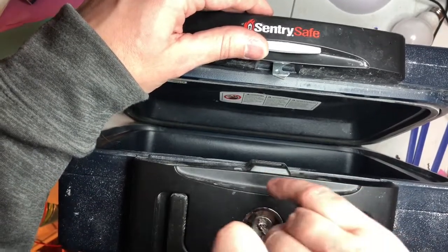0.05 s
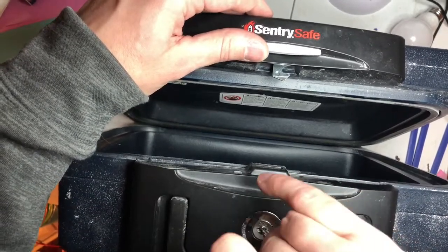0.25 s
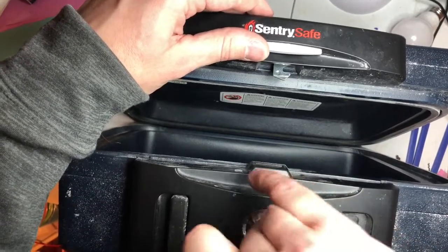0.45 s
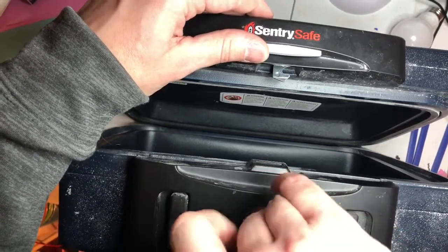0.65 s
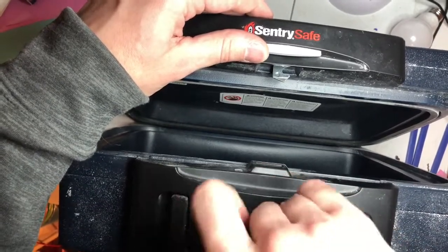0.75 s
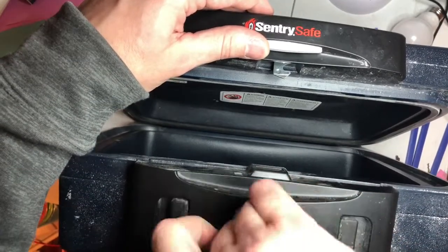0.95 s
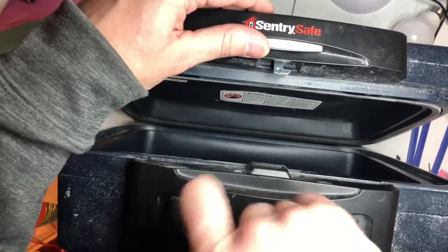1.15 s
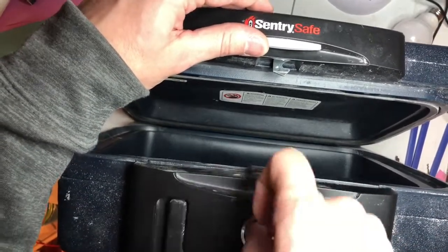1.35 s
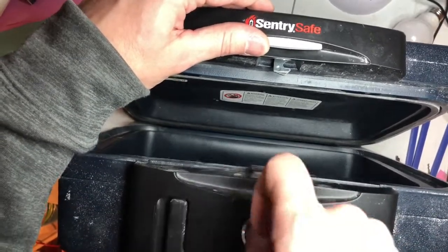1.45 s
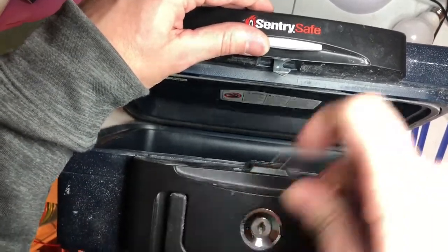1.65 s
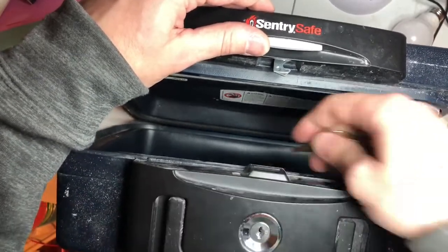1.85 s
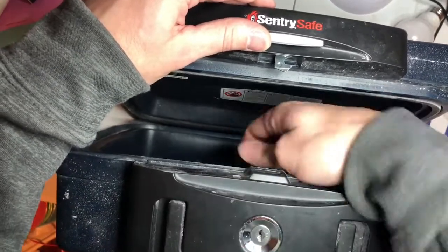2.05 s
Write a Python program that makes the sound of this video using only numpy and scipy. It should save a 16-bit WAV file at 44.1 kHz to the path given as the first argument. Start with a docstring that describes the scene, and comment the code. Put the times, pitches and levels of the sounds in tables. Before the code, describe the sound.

A key and metal latch click on a hollow plastic chest, close by in a quiet room, with the loudest clack and a hollow thud near 0.5 seconds. Faint finger rubbing and sleeve rustle join lighter clicks from 0.8 to 1.5 seconds. At about 1.75 seconds the key comes free with a briefly ringing click. A light scrape and faint key jingle follow around 2 seconds.

```python
"""A hand works the key and metal latch of a hollow plastic chest, close by in a small quiet room.
Key and latch click and grind first, loudest near 0.46 s: impacts excite the modes of shell and latch,
and shoves set the cavity booming. Then fingers rub the shell, a sleeve rustles and a second run of
clicks builds to 1.4 s. Near 1.75 s the key comes free and the lock panel springs back;
last, the hand scrapes the rim and the key is carried off with a faint jingle."""
import sys
import numpy as np
from scipy import signal
from scipy.io import wavfile
from scipy.ndimage import uniform_filter1d

SR = 44100
rng = np.random.default_rng(int(sys.argv[2]) if len(sys.argv) > 2 else 0)


def digitize_waveform(pressure):
    """Quantize a signal to 16-bit integers and store it at the path in sys.argv[1].

    Rows of a 2-D input are taken as channels; values are limited to [-1, 1].
    """
    field = np.atleast_2d(pressure).T
    bounded = np.clip(field, -1, 1)
    quanta = np.round(bounded * 32767).astype(np.int16)
    wavfile.write(sys.argv[1], SR, quanta)


N = 92610
T = np.arange(N) / SR


def amp(db):
    """Amplitude ratio of a level in decibels."""
    return 10 ** (np.asarray(db) / 20)


def unit(x):
    """Normalisation to an rms of one."""
    return x / np.sqrt(np.mean(x ** 2) + 1e-20)


def read(points, hz):
    """Interpolation along a logarithmic frequency axis."""
    frequency_hz, value = np.transpose(points)
    return np.interp(np.log(hz + 0.00085), np.log(frequency_hz), value)


def level(points):
    """Amplitude envelope, interpolated in decibels."""
    return amp(np.interp(T, *np.transpose(points)))


def add(mix, start_s, sound):
    """Superposition of a sound on the mix."""
    part = mix[max(round(start_s * SR), 0):][:len(sound)]
    part += sound[:len(part)]


def colour(x, spectrum, scale=1, size=4096):
    """Minimum-phase filtering by a spectrum whose frequencies are multiplied by scale."""
    hz = abs(np.fft.fftfreq(size, 1 / SR))
    log_gain = np.log(amp(read(spectrum, hz / scale)))
    response = np.exp(np.conj(signal.hilbert(log_gain)))
    taps = np.fft.ifft(response).real[:size // 2]
    return signal.fftconvolve(x, taps)[:len(x)]


def impulses(per_s, spread_db=3):
    """A Poisson train of tiny jerks, a few much larger than the rest."""
    train = (rng.random(N) < per_s / SR) * rng.choice([-1, 1], N)
    return train * amp(spread_db * np.minimum(rng.exponential(1, N), 3))


# Spectrum of the quiet room: frequency_hz, gain_db
BACKGROUND_SPECTRUM = [(20, -17.5), (50, 3), (130, 4.5), (300, -2.5), (700, -13), (1500, -13.5),
                       (4000, -14.5), (9000, -25), (16000, -26.5)]

def background(level_db=-67):
    """Stationary noise, strongest in the bass."""
    return amp(level_db) * unit(colour(rng.standard_normal(N), BACKGROUND_SPECTRUM))


# Envelope of the shifting grip: time_s, level_db
GRIP_ENVELOPE = [(0, -84), (.14, -72), (.24, -56), (.36, -66.5), (.55, -60.5), (.7, -62.5), (.8, -58),
                 (.95, -57.5), (1.05, -63.5), (1.2, -61.5), (1.33, -66.5), (1.48, -59.5), (1.58, -67.5),
                 (1.8, -66.5), (2.1, -72)]
# Spectrum of its rumble: frequency_hz, gain_db
GRIP_SPECTRUM = [(25, -10.5), (55, -2.5), (100, -2.5), (135, 1), (190, -7), (260, -6.5), (380, -5),
                 (700, -17.5), (2000, -53.5)]

def grip():
    """Structure-borne noise: the case rumbles as the hand leans and shifts on it."""
    return level(GRIP_ENVELOPE) * unit(colour(rng.standard_normal(N), GRIP_SPECTRUM))


# Contacts of key, latch and shell: start_s, pitch_hz, knock_db, clack_db, tick_db, sparkle_db
CONTACTS = [ (.080, 650, -49, -79, -102, -82), (.128, 500, -45, -39, -47.5, -83),
            (.149, 417, -40, -37, -48, -28), (.1525, 480, -35.5, -32, -41, -35),
            (.182, 575, -45, -59, -70, -74), (.197, 484, -38, -47, -59, -67),
            (.202, 410, -33.5, -45, -65, -80), (.211, 370, -33.5, -35, -61, -66),
            (.2195, 480, -39, -32, -41, -68), (.297, 616, -46.5, -53.5, -63, -79),
            (.356, 505, -64, -60.5, -58.5, -66), (.373, 403, -53, -85, -78, -82),
            (.4215, 420, -25, -26.5, -52, -49), (.432, 380, -32, -55, -52, -67),
            (0.44, 406, -35, -41, -50.5, -55), (.447, 400, -39, -26.5, -36, -57),
            (.453, 514, -23, -42, -54, -54.5), (.460, 384, -23, -35, -48, -44),
            (.465, 458, -17, -23, -26.5, -37), (.4715, 291, -20, -14.5, -16, -27.5),
            (.481, 560, -26, -38, -39, -47), (.563, 670, -45.5, -53, -66, -78),
            (.841, 1200, -49, -57, -67, -78), (.878, 500, -44.5, -61, -70, -80),
            (.909, 443, -45.5, -43, -43.5, -41.5), (.930, 514, -41.5, -39.5, -63, -74),
            (.941, 513, -51, -50.5, -52.5, -72), (1.001, 720, -51, -61, -78, -80),
            (1.018, 655, -41, -53, -70, -80), (1.030, 576, -34, -44.5, -70, -80),
            (1.038, 537, -34, -46, -61, -78), (1.057, 540, -42.5, -55, -74, -80),
            (1.100, 620, -48, -55, -68, -77), (1.129, 690, -31.5, -40.5, -51.5, -52.5),
            (1.179, 1170, -39.5, -47.5, -77, -78), (1.232, 560, -44, -44.5, -65, -68),
            (1.246, 574, -45.5, -54, -46.5, -76), (1.294, 553, -46.5, -56, -54, -55),
            (1.305, 554, -56, -70, -61, -54), (1.3395, 800, -49, -56, -66, -61),
            (1.341, 1340, -39.5, -48, -48, -42), (1.378, 670, -38.5, -65, -77, -87),
            (1.390, 640, -41, -50, -63, -60), (1.399, 646, -44, -56, -50, -58),
            (1.411, 700, -31, -44, -47, -44), (1.416, 620, -37, -40, -33.5, -43),
            (1.425, 510, -29, -62, -48, -61), (1.437, 500, -40.5, -56, -45, -41),
            (1.445, 553, -38, -47, -59, -30), (1.455, 680, -43, -57, -55, -38),
            (1.468, 606, -47, -39, -40, -39), (1.471, 700, -32.5, -37, -39.5, -59),
            (1.480, 590, -45, -45, -53, -50), (1.748, 621, -36.5, -38.5, -36.5, -45.5),
            (1.752, 557, -36.5, -46.5, -71, -60), (1.771, 498, -47, -52, -51, -58.5),
            (1.817, 597, -47.5, -51, -47.5, -66)]
# Knock of the plastic shell: ratio_to_pitch, gain_db
KNOCK_SPECTRUM = [(.08, -37), (.3, -21.5), (.7, -2.5), (1, 1.5), (1.5, -4.5), (2.4, -12), (6, -64)]
# Clack of the latch plate: frequency_hz, gain_db
CLACK_SPECTRUM = [(300, -37), (800, -5), (1150, 2.5), (1850, 2), (2300, 7), (3200, -9.5), (4200, -14.5),
                  (5200, -36), (12000, -57)]
# Tick of the small steel parts: frequency_hz, gain_db
TICK_SPECTRUM = [(1200, -53.5), (2800, 1.5), (4200, 2.5), (5100, -3.5), (6500, -1.5), (8200, -5),
                 (10500, -12.5), (15000, -24)]
# Sparkle of their edges: frequency_hz, gain_db
SPARKLE_SPECTRUM = [(4000, -44), (8500, 2.5), (11000, 2.5), (13000, 10.5), (15000, 14.5), (16500, -18.5)]

def impact(spectrum, t60_s, scale=1, snap=1, snap_s=0.00029):
    """Dense modes struck together act as decaying noise, led by a brief snap."""
    t = T[:SR // 8]
    decay = amp(-60 * t / t60_s)
    onset = snap * t / snap_s * np.exp(1 - t / snap_s)
    rattle = colour(rng.standard_normal(len(t)) * (decay + onset), spectrum, scale)
    return rattle * np.linalg.norm(decay) / np.linalg.norm(rattle)


def contacts():
    """Impact excitation: each contact sounds the shell, the latch plate and the small steel parts."""
    out = np.zeros(N)
    for start_s, pitch_hz, knock_db, clack_db, tick_db, sparkle_db in CONTACTS:
        knock = amp(knock_db) * impact(KNOCK_SPECTRUM, t60_s=0.047, scale=pitch_hz)
        clack = amp(clack_db) * impact(CLACK_SPECTRUM, t60_s=0.022)
        tick = amp(tick_db) * impact(TICK_SPECTRUM, t60_s=0.03, snap=1.6)
        sparkle = amp(sparkle_db) * impact(SPARKLE_SPECTRUM, t60_s=0.016, snap=3.8)
        add(out, start_s, knock + clack + tick + sparkle)
    return out


def resonate(x, hz, width_hz):
    """A damped resonator with a gain of about one at its peak."""
    radius = np.exp(-np.pi * width_hz / SR)
    pole = radius * np.exp(2j * np.pi * hz / SR)
    return 2 * signal.lfilter([1 - radius], [1, -pole], x).real


# Modes of shell and latch: frequency_hz, peak_gain_db, t60_s (before the cap on cycles)
CHEST_MODES = [(270, -5, .04), (339.7, 2, 0.033), (397, 1.5, .12), (521.5, -2, .1), (579, -4, 0.1),
               (630, -6, .08), (708, -1.5, 0.059), (843, -4, .06), (1089, -6, 0.028), (1452, -7.5, 0.048),
               (2247, -1.5, 0.046), (2430, -7.5, .03), (4225, 1, .025), (6900, -16, .014)]

def chest(x, direct_db=-2, ring_db=-3, max_cycles=85):
    """Modal resonance: shell and latch ring on when driven; the hand damps the high modes."""
    ring = np.zeros(N)
    for hz, gain_db, t60_s in CHEST_MODES:
        width_hz = np.log(1000) / np.pi / min(t60_s, max_cycles / hz)
        ring += amp(gain_db) * resonate(x, hz, width_hz)
    return amp(direct_db) * x + amp(ring_db) * ring


# Slides of key and bolt under load: start_s, length_s, level_db
GRINDS = [(0.149, 0.072, -60.5), (0.214, 0.017, -60), (0.437, 0.026, -42.5), (0.457, 0.017, -33.5),
          (1.41, 0.038, -51), (1.448, 0.038, -54)]
# Spectrum of the sliding metal: frequency_hz, gain_db
GRIND_SPECTRUM = [(300, -16.5), (1000, 4), (2300, 2.5), (3200, -1.5), (5000, -9), (7000, -3), (9000, -10.5),
                  (12500, -14.5), (15500, -3), (16500, -15)]

def grinding(ramp_s=0.0044):
    """Sliding friction: metal drags over metal in a dense train of slips."""
    envelope = np.zeros(N)
    for start_s, length_s, level_db in GRINDS:
        inside_s = np.minimum(T - start_s, start_s + length_s - T)
        envelope += amp(level_db) * np.clip(inside_s / ramp_s + .5, 0, 1)
    return envelope * unit(colour(impulses(per_s=1400), GRIND_SPECTRUM))


# Shoves on the chest: start_s, level_db
SHOVES = [(0.149, -54), (0.203, -50.5), (.235, -60), (0.422, -46), (.462, -32.5), (0.801, -56),
          (1.029, -54), (1.131, -53.5), (1.413, -50.5)]
# Thud through its base: frequency_hz, gain_db
THUD_SPECTRUM = [(20, -33), (48, 3), (70, 0), (105, 0.5), (200, -15), (400, -31.5)]

def boom(cavity_hz=135.1, cavity_t60_s=0.48, thud_db=-4.5, thud_t60_s=0.23, rise_s=0.006):
    """Cavity resonance: a shove thuds through the base and sets the hollow ringing."""
    out, t = np.zeros(N), T[:SR * 3 // 4]
    attack = 1 - np.exp(-t / rise_s)
    cavity = np.sin(2 * np.pi * cavity_hz * t) * amp(-60 * t / cavity_t60_s)
    thud_decay = amp(thud_db - 60 * t / thud_t60_s)
    for start_s, level_db in SHOVES:
        thud = unit(colour(rng.standard_normal(len(t)), THUD_SPECTRUM)) * thud_decay
        add(out, start_s, amp(level_db) * (cavity + thud) * attack)
    return out


# Envelope of fingers creeping over the shell: time_s, level_db
RUB_ENVELOPE = [(0, -62), (.3, -116), (.4, -54), (.68, -71.5), (.8, -57), (.92, -54.5), (.99, -63),
                (1.05, -51.5), (1.2, -49), (1.27, -60.5), (1.33, -68), (1.42, -43), (1.49, -56),
                (1.56, -72.5), (1.8, -66.5), (2.1, -86.5)]
# Spectrum of their slips: frequency_hz, gain_db
RUB_SPECTRUM = [(60, -19), (200, -13.5), (300, -1.5), (420, 2), (800, -3), (1400, -8.5), (2600, -22),
                (5000, -37), (16000, -58.5)]

def rubbing():
    """Stick-slip friction: fingers catch on the shell and let go in small jerks."""
    return level(RUB_ENVELOPE) * unit(colour(impulses(per_s=420), RUB_SPECTRUM))


# Envelope of sleeve and skin brushing: time_s, level_db
RUSTLE_ENVELOPE = [(0, -83), (.6, -77), (.72, -66.5), (.87, -61.5), (.98, -74), (1.08, -67), (1.3, -68.5),
                   (1.4, -66), (1.6, -77), (1.73, -73), (1.78, -70), (1.83, -59.5), (1.87, -70.5),
                   (1.9, -65.5), (1.93, -54.5), (2.0, -53), (2.05, -64.5), (2.1, -67.5)]
# Spectrum of the brushing: frequency_hz, gain_db
RUSTLE_SPECTRUM = [(100, -9), (450, 10), (1200, 4.5), (2400, 0.5), (6000, -1.5), (10000, -6), (15000, -4),
                   (16500, -15)]

def rustle(grain_db=3):
    """Friction noise of cloth and skin, amplitude-modulated into fine, uneven grains."""
    grains = amp(grain_db * unit(uniform_filter1d(rng.standard_normal(N), size=90)))
    return level(RUSTLE_ENVELOPE) * unit(colour(rng.standard_normal(N) * grains, RUSTLE_SPECTRUM))


# Envelope of the freed keys shivering together: time_s, level_db
SHIMMER_ENVELOPE = [(1.735, -83), (1.745, -57), (1.76, -69), (1.775, -59.5), (1.795, -60.5), (1.83, -77),
                    (1.86, -79), (1.9, -82), (2.055, -83.5), (2.066, -52), (2.08, -59.5), (2.1, -74)]
# Spectrum of their taps: frequency_hz, gain_db
SHIMMER_SPECTRUM = [(3000, -30), (4300, -0.5), (5500, -8.5), (9000, -2.5), (10600, 4), (12400, -5),
                    (14000, 0.5), (15500, 2), (16500, -15)]

def shimmer():
    """Shot noise: many tiny collisions merge as the keys leave the lock."""
    envelope = level(SHIMMER_ENVELOPE) * (T > SHIMMER_ENVELOPE[0][0])
    return envelope * unit(colour(impulses(per_s=2500), SHIMMER_SPECTRUM))


# Modes of the lock panel: frequency_hz, level_db, t60_s
PANEL_MODES = [(394.5, -37.5, .15), (516.5, -34, 0.12), (629, -32, .1), (1462, -39.5, 0.038),
               (3030, -45, .03)]

def spring_back(start_s=1.7492, low_cut_hz=330):
    """Free vibration: the released lock panel rings briefly in the midrange, bass filtered out."""
    out, t = np.zeros(N), T[:SR // 4]
    ring = sum(amp(db - 60 * t / t60_s) * np.sin(2 * np.pi * hz * t) for hz, db, t60_s in PANEL_MODES)
    highpass = signal.butter(3, low_cut_hz, "highpass", fs=SR, output="sos")
    add(out, start_s, signal.sosfilt(highpass, ring))
    return out


# Taps of the dangling key on its ring: start_s, level_db
KEY_TAPS = [(1.771, -71), (1.873, -78), (2.062, -57), (2.069, -56)]
# Modes of the key: frequency_hz, gain_db, t60_s
KEY_MODES = [(4150, 3, 0.043), (4296, -14, 0.12), (10500, -1, .08), (11283, 2.5, .2), (11800, -9.5, .1),
             (13706, 2, .25)]

def jingle():
    """Inharmonic partials: each tap sets the loose key chiming in high, decaying modes."""
    out, t = np.zeros(N), T[:SR // 3]
    for start_s, level_db in KEY_TAPS:
        for hz, gain_db, t60_s in KEY_MODES:
            partial = np.sin(2 * np.pi * (hz * t + rng.random()))
            add(out, start_s, amp(level_db + gain_db - 60 * t / t60_s) * partial)
    return out


# Envelope of a light scrape on the rim: time_s, level_db
SCRAPE_ENVELOPE = [(1.9, -79), (1.93, -58), (1.97, -67), (1.995, -49.5), (2.01, -47.5), (2.026, -51),
                   (2.045, -80)]
# Its resonances, each two equal stages in cascade: frequency_hz, stage_width_hz, level_db
SCRAPE_RESONANCES = [(610, 65, -1.5), (507, 126, -2.5), (6400, 240, -15.5), (10420, 220, -17)]

def scrape():
    """Forced vibration: friction of the hand on the rim drives a few narrow resonances."""
    friction = rng.standard_normal(N)
    ring = np.zeros(N)
    for hz, width_hz, level_db in SCRAPE_RESONANCES:
        first_stage = resonate(friction, hz, width_hz)
        ring += amp(level_db) * unit(resonate(first_stage, hz, width_hz))
    return level(SCRAPE_ENVELOPE) * ring * (T > SCRAPE_ENVELOPE[0][0])


# Reverberation time of the room: frequency_hz, t60_s
REVERBERATION_TIMES = [(100, 0.61), (500, 0.27), (2000, 0.29), (5000, 0.26), (10000, 0.19), (16000, .19)]

def room(x, early_db=-9, early_t60_s=0.052, echoes_per_s=1500, tail_db=-16.5, rise_s=0.0057):
    """Reverberation: early reflections from lid and desk, then a diffuse tail that dulls as it dies."""
    t = T[:SR * 3 // 4]
    hz, frame_s, bands = signal.stft(rng.standard_normal(len(t)), SR, nperseg=256)
    bands *= amp(-60 * frame_s / read(REVERBERATION_TIMES, hz)[:, None])
    tail = signal.istft(bands, SR, nperseg=256)[1][:len(t)]
    tail *= 1 - np.exp(-t / rise_s)
    early = rng.standard_normal(len(t)) * (rng.random(len(t)) < echoes_per_s / SR)
    early *= amp(-60 * t / early_t60_s) * (t > .002)
    response = amp(tail_db) * tail / np.linalg.norm(tail) + amp(early_db) * early / np.linalg.norm(early)
    return signal.fftconvolve(x, response)[:N]


def scene():
    """Superposition of the direct sounds, their reflections, the bass of the case and the background."""
    direct = chest(contacts() + rubbing() + grinding())
    direct += spring_back() + rustle() + scrape() + jingle() + shimmer()
    return (direct + background() + room(direct) + boom() + grip())[None]


def record(dry, low_cut_hz=36, high_cut_hz=16400):
    """Band limiting: the deep bass rolls off and the highest treble is cut."""
    highpass = signal.butter(3, low_cut_hz, "highpass", fs=SR, output="sos")
    lowpass = signal.firwin(301, high_cut_hz, window=("kaiser", 7), fs=SR)
    return signal.oaconvolve(signal.sosfilt(highpass, dry), lowpass[None], "same")


dry = scene()
out = record(dry)
digitize_waveform(out)
```